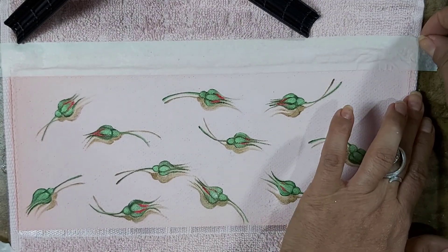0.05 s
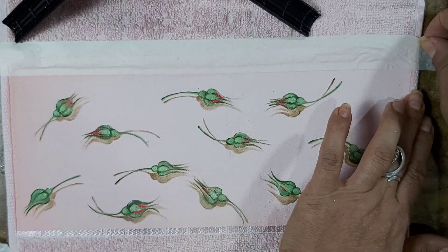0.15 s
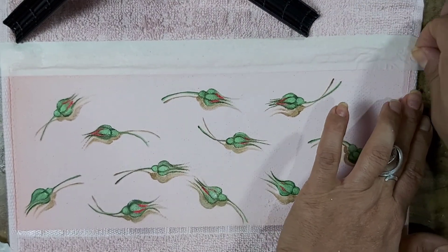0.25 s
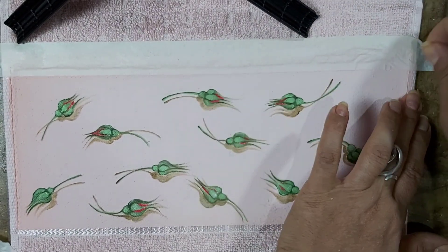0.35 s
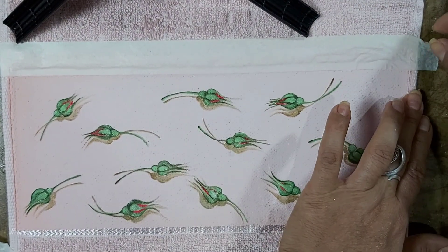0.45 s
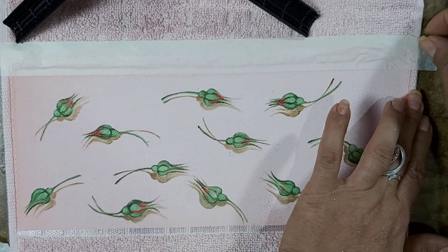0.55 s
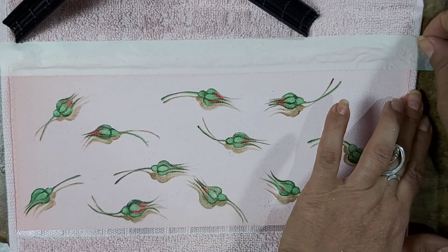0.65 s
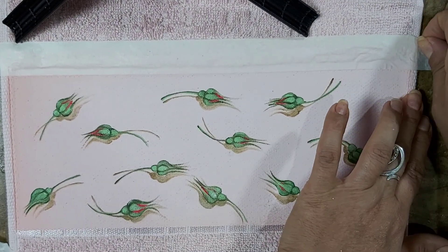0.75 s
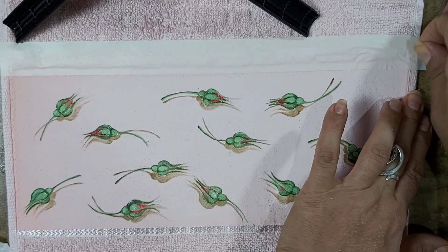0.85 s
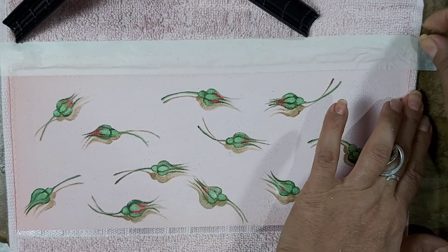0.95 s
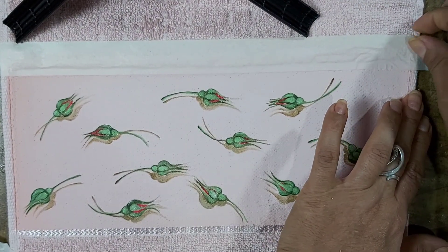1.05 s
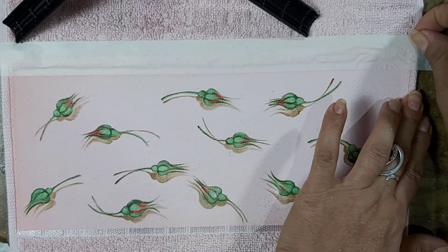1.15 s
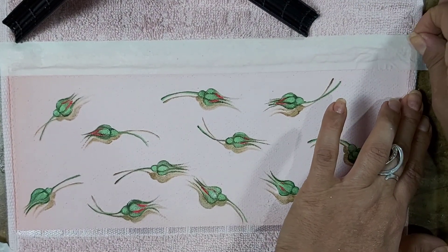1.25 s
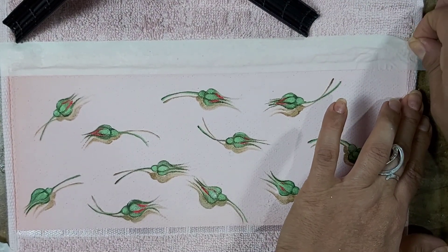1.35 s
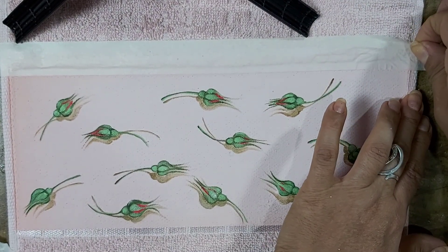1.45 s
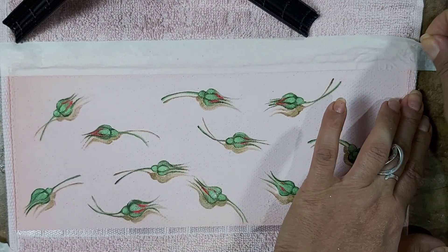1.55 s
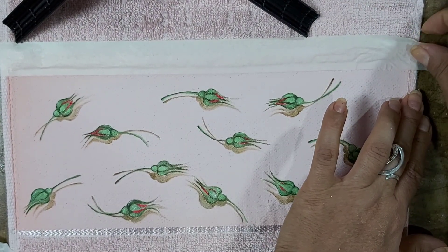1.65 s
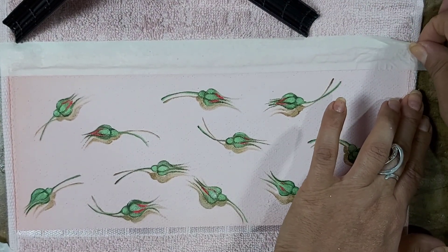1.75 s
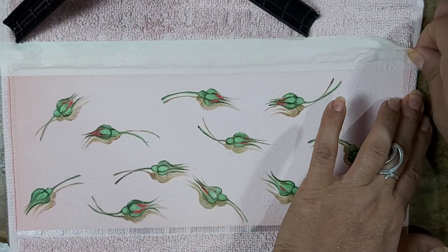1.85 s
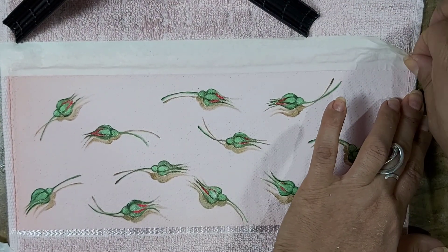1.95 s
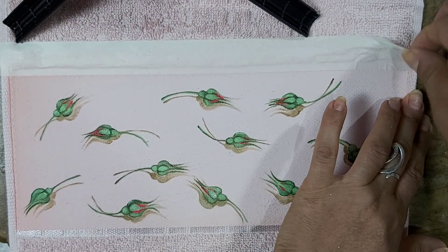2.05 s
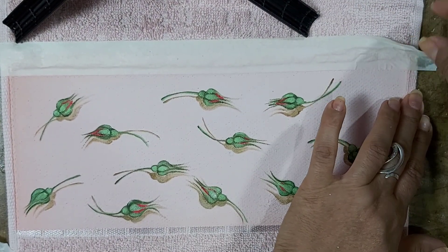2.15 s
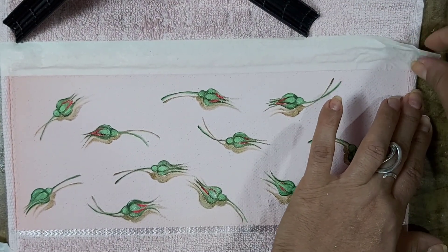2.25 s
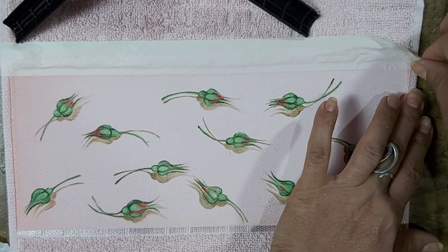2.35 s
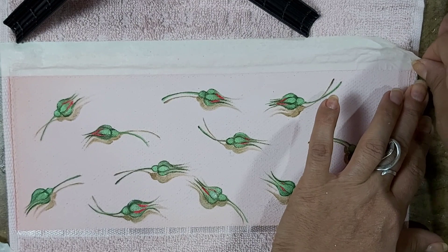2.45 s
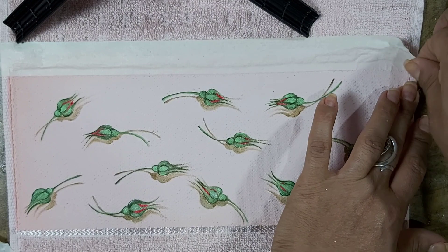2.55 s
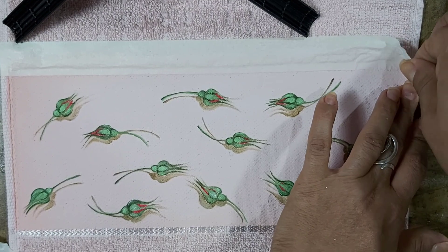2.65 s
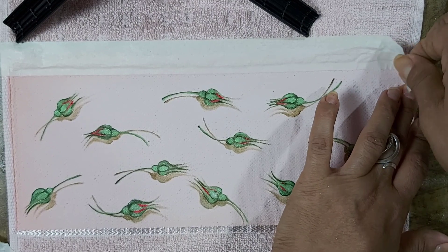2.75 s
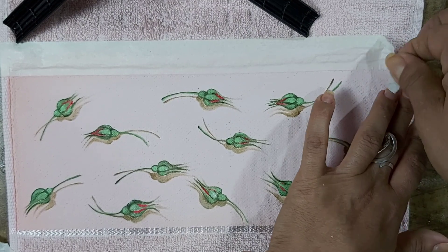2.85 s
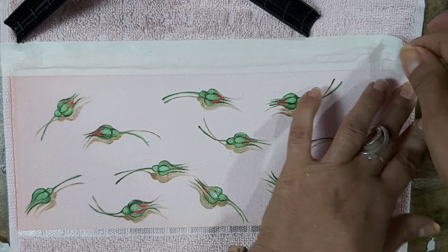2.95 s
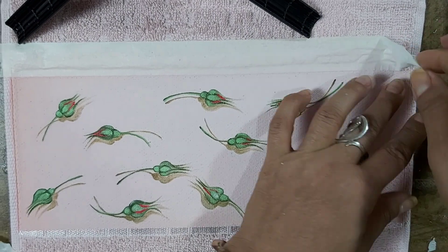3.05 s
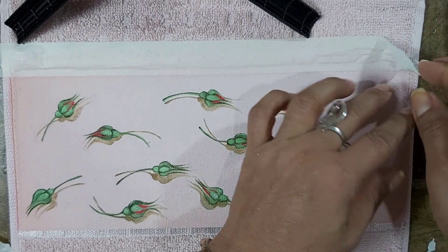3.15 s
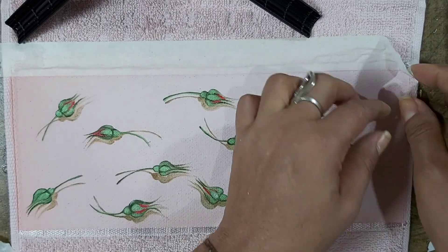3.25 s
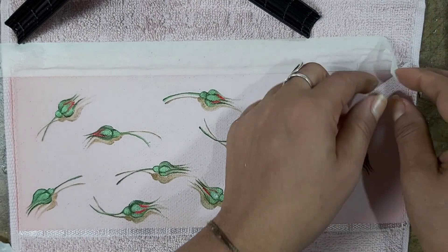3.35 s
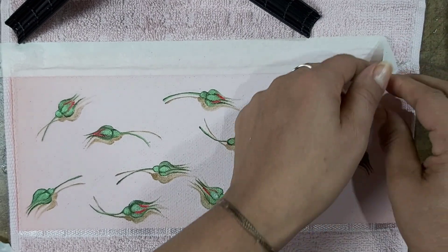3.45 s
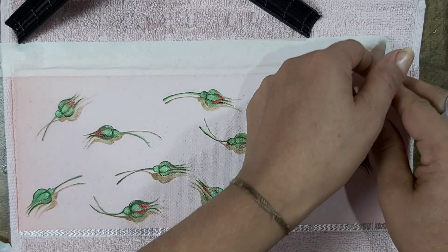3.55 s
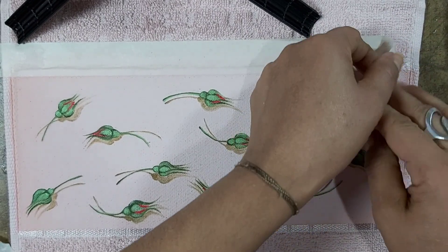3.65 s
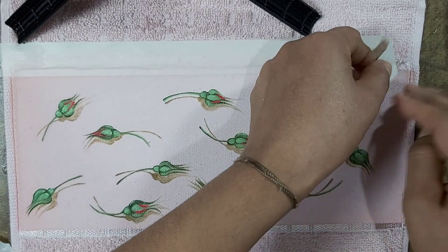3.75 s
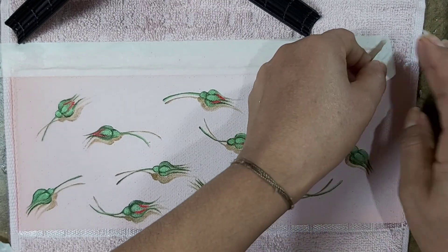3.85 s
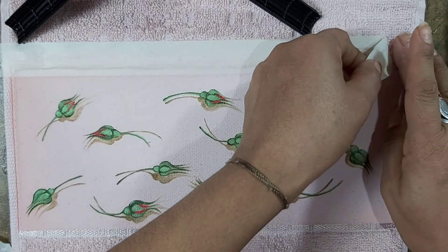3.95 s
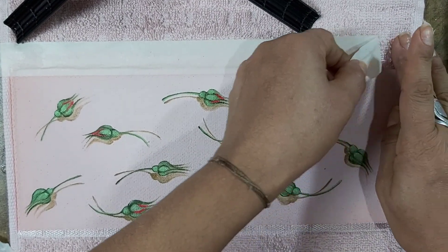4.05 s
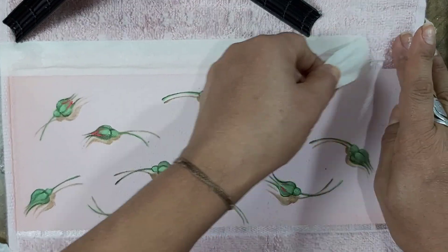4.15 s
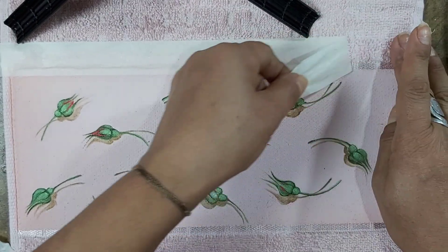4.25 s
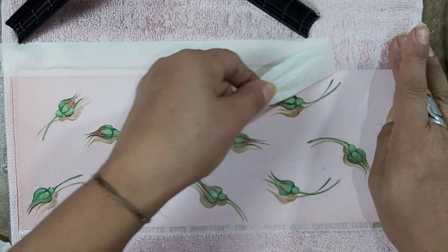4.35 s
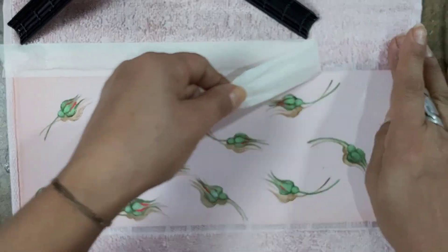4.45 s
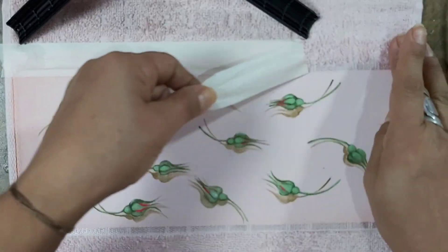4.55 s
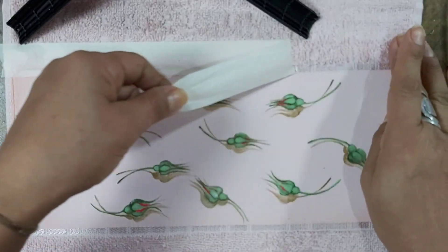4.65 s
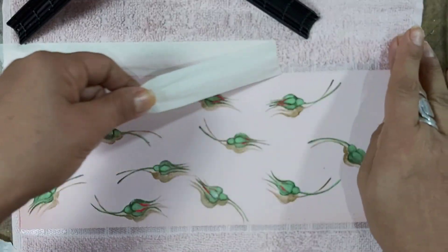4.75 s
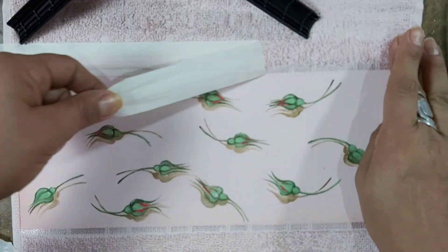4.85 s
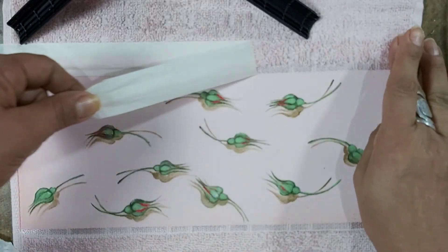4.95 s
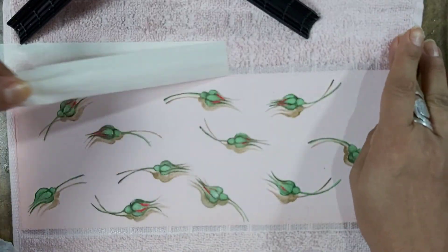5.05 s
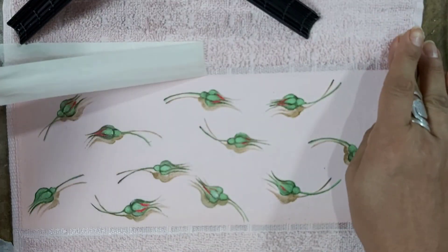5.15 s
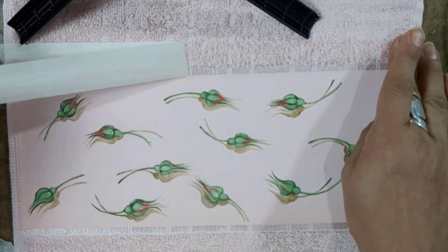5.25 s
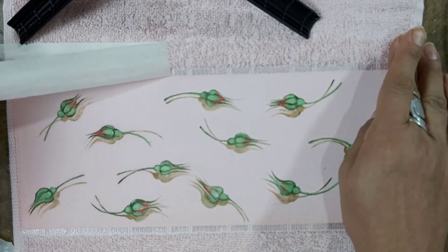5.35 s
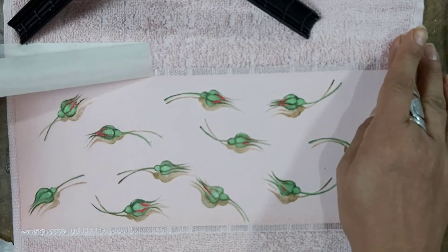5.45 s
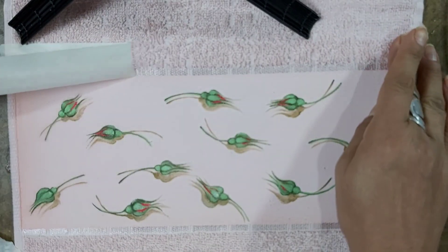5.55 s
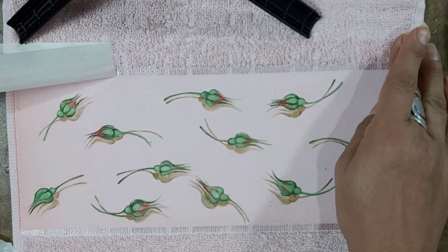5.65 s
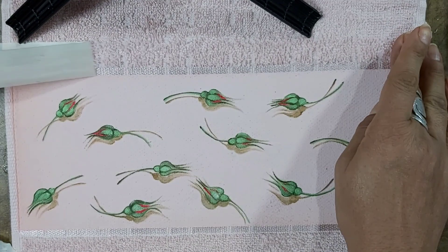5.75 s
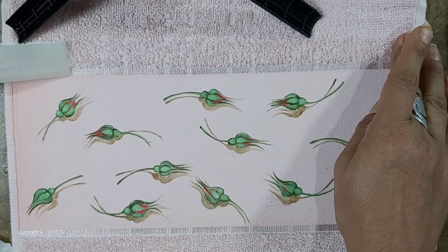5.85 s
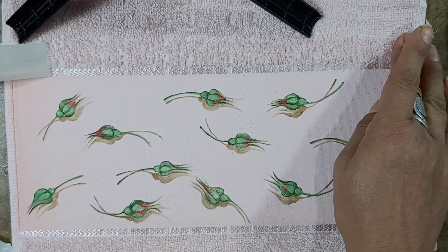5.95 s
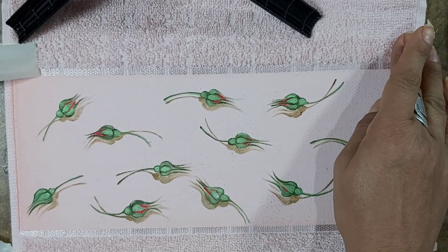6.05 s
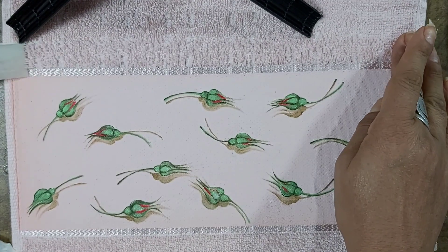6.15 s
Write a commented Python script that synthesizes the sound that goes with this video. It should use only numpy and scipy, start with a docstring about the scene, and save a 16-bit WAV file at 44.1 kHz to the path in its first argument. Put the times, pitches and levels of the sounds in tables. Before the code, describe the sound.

Masking tape is peeled from cloth stretched on a frame, close to the microphone in a small quiet room. First come a few short, scattered tugs with sharp little crackles, soft thumps and light knocks of the frame. Then one long pull gives a bright, rasping rip that drifts from left to right, while the taut cloth hums and drums faintly underneath.

```python
"""In a small quiet room, close to a phone, masking tape is peeled from cloth stretched on a frame.
A few short tugs crackle and knock the frame; then one long pull rips from left to right.
Thousands of glue threads snap, each an impulse, while the paper backing rasps below them.
The taut cloth drums and hums in its modes like a membrane, and reverberation smears the crackle."""
import sys
import numpy as np
from scipy import signal
from scipy.fft import rfft, irfft
from scipy.io import wavfile
from scipy.ndimage import uniform_filter1d, map_coordinates

SR = 44100
rng = np.random.default_rng(int(sys.argv[2]) if len(sys.argv) > 2 else 0)


def persist_wave(psi):
    """Save psi, clipped to +-1, as 16-bit WAV."""
    counts = np.round(np.clip(psi, -1, 1) * 32767).astype(np.int16)
    wavfile.write(sys.argv[1], SR, np.atleast_2d(counts).T)


N = 272979
T, FREQ = np.arange(N) / SR, np.fft.rfftfreq(N, 1 / SR)
TOP_HZ = 14600


def peel(crackle, rasp, ring_hz, ring_db):
    """Shot noise: glue threads snap one by one, more of them as the pull speeds up."""
    # relative spectrum of glue and backing: frequency_hz, level_db
    tape_spectrum = [(300, 4), (600, -11.5), (900, -4), (1400, -4), (1900, -4.3), (2800, -4.5), (4200, -2),
                     (5800, -1), (7600, 1), (10000, 1.1), (12000, 3), (13200, 1.3), (14700, -5)]
    snaps_per_s = 11500 * (0.12 + crackle / crackle.max())
    sizes = undb(3.5 * np.minimum(rng.exponential(size=N), 4)) * rng.choice([-1, 1], N)
    threads = unit((rng.random(N) < snaps_per_s / SR) * sizes / np.sqrt(snaps_per_s))
    # the hand evens out the force over 11 ms
    threads /= np.sqrt(uniform_filter1d(threads ** 2, int(0.011 * SR)) + 1e-6)
    # stick-slip: the edge stutters, a little more while the pull is young
    stutter_db = 1.79 + 0.3 * np.exp(-travel() / 0.14)
    spectrum = rfft(threads * undb(stutter_db * walk(rate_hz=260)))
    colour = undb(at(tape_spectrum, FREQ)) * FREQ ** 2 / (FREQ ** 2 + 250 ** 2)
    treble_rms = np.sqrt(np.mean(colour ** 2 * ((FREQ > 4000) & (FREQ < 15000))))
    middle_rms = np.sqrt(np.mean(colour ** 2 * ((FREQ > 700) & (FREQ < 2800))))
    # the freed strip radiates lower as it grows longer
    lowest_hz = 345 + (960 - 345) * np.exp(-(travel() / 0.28) ** 2)
    out = 0
    for hz, window in bands(320, count=24):
        # glue crackles in the treble, the paper backing rasps below it
        bright = np.clip(np.log(hz / 2300) / np.log(4200 / 2300), 0, 1)
        gain = (crackle / treble_rms) ** bright * (rasp / middle_rms) ** (1 - bright)
        radiation = 1 / np.sqrt(1 + (lowest_hz / hz) ** 8)
        # the strip bends and changes length, so its resonance moves
        strip_db = ring_db * np.exp(-(np.log2(hz / ring_hz) / 0.25) ** 2)
        out += irfft(spectrum * colour * window, N) * gain * radiation * undb(strip_db)
    return out


def pulls():
    """Load and release: tugs build, give way, hold and fade; the strongest of tugs and rip prevails."""
    # short tugs: full_force_s, hold_s, crackle_db, rasp_re_crackle_db, rise_db_per_s, jump_db,
    # ring_hz, ring_db
    tugs = [(1.259, 0.0055, -55, -7, 236.5, 2, 12700, 3), (1.683, 0.018, -57.5, -17, 126, 10, 11900, 11),
            (1.741, 0.078, -53, -25, 139, -1.5, 12300, 4), (2.393, 0.055, -44, -7.5, 138, 5, 4260, 5.5),
            (2.585, 0.047, -43, -4.5, 71, 5, 4070, 6), (2.85, 0.03, -64.5, -6, 59.5, 1.5, 7600, 1),
            (3.427, 0.12, -66.5, -9, 898, -4, 4550, 2)]
    # resonance of the freed strip in the rip: time_s, ring_hz, ring_db
    strip_resonance = [(3.93, 9200, -1.5), (4.07, 7700, 4), (4.24, 7800, -1), (4.3, 11600, 6.5),
                       (4.36, 11400, 3.5), (4.44, 10900, 1), (4.55, 8000, 3), (4.85, 7660, 0.5),
                       (5.0, 12200, 2), (5.1, 12500, 1.5), (5.25, 8800, 1), (5.46, 8500, 4.5),
                       (5.56, 8400, 4.5), (5.7, 11700, 2), (5.9, 9100, 3), (6.19, 8900, 1)]
    lead_s, release_db_per_s = 0.163, 296
    strongest = np.array([*rip(), *curves(strip_resonance)])
    for s, hold_s, db, rasp_db, rise, jump_db, ring_hz, ring_db in tugs:
        build_db = rise * np.minimum(T - s, 0) - jump_db * (T < s)
        release_db = release_db_per_s * np.maximum(T - s - hold_s, 0)
        crackle = undb(db + build_db - release_db) * (T > s - lead_s)
        rasp = crackle * undb(rasp_db + build_db)
        tug = np.array([crackle, rasp, np.full(N, ring_hz), np.full(N, ring_db)])
        strongest = np.where(crackle > strongest[0], tug, strongest)
    return strongest


def rip():
    """Sustained excitation: the amplitude envelopes of crackle and rasp in the long pull."""
    # course of the pull: time_s, crackle_db, rasp_re_crackle_db
    long_pull = [(3.69, -86.5, -28.5), (3.79, -60, -18.5), (3.9, -51.5, -12.5), (3.95, -44.5, -8.5),
                 (4.19, -44.5, -10.5), (4.25, -47.5, -9), (4.35, -43, -11.5), (4.41, -45.5, -11),
                 (4.7, -44.8, -10), (4.82, -42.5, -10), (5.0, -40.5, -11.5), (5.2, -44, -11),
                 (5.45, -43, -9), (5.52, -47, -7), (5.56, -42, -10.5), (5.6, -46.5, -6), (5.75, -46.5, -6),
                 (5.92, -47, -13.5), (6.01, -48.5, -2.5), (6.11, -53.5, -15), (6.19, -47, -9.5)]
    crackle_db, rasp_db = curves(long_pull)
    crackle = undb(crackle_db) * (T > long_pull[0][0])
    return crackle, crackle * undb(rasp_db)


def travel():
    """Uniform motion: the share of the frame that the peeling edge has crossed."""
    start_s, crossing_s = 4.015, 2.08
    return np.clip((T - start_s) / crossing_s, 0, 1)


def snaps():
    """Impulsive release: a patch of glue lets go within a millisecond, a tick with a brief splutter."""
    # snaps of glue and paper: start_s, relative_level_db, centre_hz
    patches = [(1.173, -55.5, 9070), (1.2813, -26, 5400), (1.645, -34, 12300), (1.691, -41, 10000),
               (1.7445, -24, 11500), (1.8995, -35.5, 6850), (1.904, -34, 7860), (2.232, -49.5, 6240),
               (2.251, -52, 7540), (2.407, -22, 9500), (2.46, -26, 6300), (2.586, -24, 4940),
               (2.7463, -36, 11150), (2.862, -31.5, 9600), (3.424, -36.5, 12800), (3.437, -37, 5700),
               (3.505, -31.5, 4500), (3.8193, -27.5, 12500), (3.862, -41, 10000), (3.952, -19, 9300),
               (4.069, -22, 8040), (4.131, -28, 8600), (4.1876, -20.5, 8950), (4.1873, -20.5, 12000),
               (4.3473, -16, 12200), (4.939, -24, 10700), (5.041, -21, 12400)]
    out = np.zeros(N)
    for s, db, hz in patches:
        tick = 0.16 * burst(decay_s=0.00024)
        tick[0] = 1
        add(out, s, tint(tick, resonance(hz, width_hz=11600) ** 2), db - 0.5)
    return out


def knocks():
    """Impact excites modes: each blow thumps the cloth, clacks the frame and flicks the paper."""
    # blows of hand and tape, levels relative: start_s, thump_db, clack_db, clack_hz, crack_db
    blows = [(0.441, -40.5, -62, 700, -92), (.462, -44.5, -74, 700, -92), (1.281, -36.5, -38.5, 900, -22.5),
             (1.305, -39, -45, 600, -33), (1.3282, -35.5, -48, 400, -44), (1.4929, -44, -55.5, 1100, -60),
             (1.521, -36, -54, 1100, -59), (1.543, -39, -54, 1004, -70), (1.566, -41, -65, 900, -78),
             (1.8993, -49, -53, 990, -33.5), (2.106, -32, -45, 1410, -52), (2.132, -32.5, -57, 1400, -73),
             (2.153, -32.5, -51, 1200, -60), (2.861, -33.5, -29.5, 830, -58), (2.884, -37.5, -47, 890, -68),
             (2.908, -34.5, -42, 600, -75), (3.502, -45, -54, 930, -34.5)]
    # modes of the cloth under a fingertip: pitch_hz, width_hz, level_db
    thump_modes = [(135, 130, 6), (179, 40, 8.5), (240, 49, 6), (274, 26, -5)]
    # modes of the held frame: pitch_hz, width_hz, level_db
    frame_modes = [(473, 55, 3.5), (563, 61, 0), (790, 60, 0.5), (960, 280, -3), (1136, 69, -4),
                   (1520, 270, -12)]
    # longer-ringing modes once the hand no longer holds it down: pitch_hz, width_hz, level_db
    free_modes = [(773, 17, 2), (954, 14, 8), (980, 8.3, 5.7), (1106, 24, 1)]
    # relative spectrum of the papery crack: frequency_hz, level_db
    crack_spectrum = [(250, -14), (450, -8), (900, -5.5), (1800, -2), (3000, -12), (6000, -14),
                      (14000, -35)]
    soft_hz, freed_s = 302, 2.8
    soft_lowpass = 1 / (1 + 1j * FREQ / soft_hz - (FREQ / soft_hz) ** 2) ** 2
    thump = irfft(modes(thump_modes) * soft_lowpass, N)
    held = irfft(modes(frame_modes), N)[:SR // 2]
    free = held + irfft(modes(free_modes), N)[:SR // 2]
    crack_colour = undb(at(crack_spectrum, FREQ))
    thumps, clatter = np.zeros((2, N))
    for s, thump_db, clack_db, clack_hz, crack_db in blows:
        clack = tint(free if s > freed_s else held, resonance(clack_hz, width_hz=770))
        crack = tint(burst(decay_s=0.0036), crack_colour)
        add(thumps, s, thump, thump_db - 2.5)
        add(clatter, s, clack, clack_db + 0.5)
        add(clatter, s, crack, crack_db - 6)
    return thumps, clatter


def cloth_drum():
    """Membrane vibration: the pull shakes the cloth's low modes like those of a slack drumhead."""
    # shoves that set the cloth drumming: centre_s, level_db, half_width_s
    shoves = [(3.04, -51.5, 0.14), (3.49, -57.5, 0.076), (3.86, -66, 0.17), (4.23, -49, 0.091),
              (4.82, -57, 0.063), (5.04, -53, 0.075), (5.44, -47.5, 0.11), (5.65, -43.5, 0.11),
              (5.88, -54, 0.088), (6.09, -56, 0.043)]
    # one mode groans near the end of the frame: centre_s, level_db, half_width_s
    groans = [(5.87, -44.5, 0.092), (6.08, -44, 0.037)]
    # overtones that grow toward the far end: pitch_hz, level_re_crackle_db
    overtones = [(66, -15), (84, -11), (105, -8.5)]
    crackle, _ = rip()
    rest_db, slack_s, sag_hz_per_s = -79.5, 5.6, 24
    drive = undb(rest_db) + undb(-14.5) * crackle + swells(shoves)
    # the lowest mode sinks once the tape lets the cloth go slack
    lowest_hz = 51.4 - sag_hz_per_s * np.maximum(T - slack_s, 0)
    fundamental = sway(lowest_hz, drive, waver_db=2.5)
    groan = sway(hz=129, gain=swells(groans), waver_db=-0.5)
    rumble = sum(sway(hz, undb(db) * crackle * travel() ** 3, waver_db=7.5) for hz, db in overtones)
    return fundamental + groan + rumble


def sway(hz, gain, waver_db):
    """Forced oscillation: an uneven pull keeps one mode swinging, wavering in pitch and level."""
    phase = 2 * np.pi * np.cumsum(hz * (1 + 0.0393 * walk(rate_hz=22))) / SR
    return np.sqrt(2) * np.sin(phase) * gain * undb(waver_db * walk(rate_hz=14))


def cloth_hum(rasp):
    """Random excitation: hand and tape drive the cloth's higher modes, and their powers add."""
    # modes of the stretched cloth: pitch_hz, width_hz, level_db
    cloth_modes = [(85, 26, -1), (117.4, 16, -1), (146, 3.5, 4), (161.4, 14.4, -3.5), (188, 8.3, -7.5),
                   (217.9, 3.4, 1), (250, 11, -13), (295.5, 7.7, -2.5), (321, 5.9, -22.5)]
    # the steadying hand settles, then eases off: time_s, weight_share
    hand_weight = [(0, 0.17), (1.5, 0.41), (2.25, 0.94), (3.1, 0.97), (3.35, 0.32)]
    hand = undb(-60) * curves(hand_weight)[0]
    pull = rip()[0] * undb(-12 + 9.5 * travel() ** 2)  # grows as the tape frees the cloth
    drive = np.sqrt(hand ** 2 + (undb(-4.5) * rasp) ** 2 + pull ** 2)
    power = sum(np.abs(undb(db) * resonance(hz, width)) ** 2 for hz, width, db in cloth_modes)
    passband = FREQ ** 2 / (FREQ ** 2 + 50 ** 2) / np.sqrt(1 + (FREQ / 400) ** 8)
    return drive * unit(shape(diffuse(), np.sqrt(power) * passband))


def brushes():
    """Friction noise: skin slides softly over the weave."""
    # strokes of skin: centre_s, relative_level_db, half_width_s, centre_hz
    strokes = [(0.092, -72, 0.022, 6400), (0.643, -74.5, 0.011, 6400), (0.963, -80.5, 0.022, 6400),
               (1.537, -74, 0.025, 9000), (1.615, -86, .012, 12500), (2.175, -74.5, 0.029, 9000),
               (2.26, -75.5, 0.083, 905), (3.313, -82.5, 0.17, 5600)]
    noise = rng.standard_normal(N)
    return sum(swells([(s, db, width_s)]) * unit(shape(noise, resonance(hz, hz)))
               for s, db, width_s, hz in strokes)


def room(x, wet_db, early_db, early_s, steps):
    """Reverberation: early reflections from table and frame, and the walls' tail, along the hand's path."""
    # decay of the room: frequency_hz, t60_s
    decay_times = [(100, 0.25), (700, 0.3), (2000, 0.29), (5000, 0.27), (14000, 0.17)]
    t = T[:SR // 3]
    late_noise, early_noise = diffuse(), diffuse()
    layers = [(shape(late_noise, window), np.exp(-np.log(1000) * t / at(decay_times, hz)))
              for hz, window in bands(100, count=6)]
    build_up, early_decay = 1 - np.exp(-t / 0.00043), np.exp(-t / early_s)
    out = np.zeros((2, N + len(t)))
    place = np.arange(N) * steps / N
    for k, start in enumerate(rng.integers(0, N - len(t), steps + 1)):
        part = slice(start, start + len(t))
        tail = sum(layer[:, part] * decay for layer, decay in layers) * build_up
        early = early_noise[:, part] * early_decay
        response = (undb(wet_db) * unit(tail) + undb(early_db) * unit(early)) / np.sqrt(len(t))
        # each place has its own impulse response and hands over smoothly to the next
        a, b = np.searchsorted(place, [k - 1, k + 1])
        faded = x[a:b] * np.cos(np.pi / 2 * (place[a:b] - k))
        heard = signal.fftconvolve(faded[None], response, axes=1)
        out[:, a:a + heard.shape[1]] += heard
    return out[:, :N]


def ambience():
    """Background noise: the low rumble of the house under a smooth hiss."""
    # relative spectrum of the background: frequency_hz, level_db
    house_spectrum = [(30, -13.5), (50, -6), (90, -6.5), (140, 1.5), (190, -7), (280, -8.5), (400, -21.5),
                      (700, -27.5), (1900, -33), (7000, -44), (11000, -37.5), (14500, -37.5)]
    return undb(-64) * unit(shape(diffuse(), undb(at(house_spectrum, FREQ))))


def diffuse():
    """Diffuse field: noise from all sides is coherent at two microphones only in the bass."""
    # likeness of the two channels: frequency_hz, coherence_ratio
    coherence = [(60, 0.73), (130, 0.92), (290, 0.67), (640, 0.031), (1400, 0), (3000, 0)]
    mid, side = rng.standard_normal((2, N))
    alike = np.clip(at(coherence, FREQ), 0, 1)
    common, opposed = shape(mid, np.sqrt((1 + alike) / 2)), shape(side, np.sqrt((1 - alike) / 2))
    return np.array([common + opposed, common - opposed])


def resonance(hz, width_hz):
    """Response of a damped oscillator, gain 1 at its centre."""
    return 1j * FREQ * width_hz / (hz ** 2 - FREQ ** 2 + 1j * FREQ * width_hz)


def modes(table):
    """Superposition: a body's response is the sum of its modes."""
    return sum(undb(db) * resonance(hz, width) for hz, width, db in table)


def shape(x, response):
    """Linear filtering by a frequency response."""
    return irfft(rfft(x) * response, N)


def tint(x, response):
    """Linear filtering of a short sound; it dies away within the first half, which is kept."""
    response = np.interp(np.fft.rfftfreq(len(x), 1 / SR), FREQ, response)
    return irfft(rfft(x) * response, len(x))[:len(x) // 2]


def bands(low_hz, count):
    """Filter bank: log-spaced centres with overlapping windows that sum to 1."""
    centres = np.geomspace(low_hz, TOP_HZ, count)
    return [(hz, np.interp(np.log(FREQ + 1), np.log(centres), row))
            for hz, row in zip(centres, np.eye(count))]


def burst(decay_s):
    """A quarter second of noise in exponential decay."""
    return rng.standard_normal(SR // 4) * np.exp(-np.minimum(T[:SR // 4] / decay_s, 50))


def walk(rate_hz):
    """Smooth random modulation with spread near 1."""
    knots = rng.standard_normal(4096)
    return 1.2 * np.interp(T * rate_hz, np.arange(len(knots)), knots)


def swells(table):
    """Gaussian swells of gain, one for each row."""
    return sum(undb(db) * np.exp(-((T - s) / width_s) ** 2) for s, db, width_s in table)


def curves(table):
    """Each column of a timed table, interpolated sample by sample."""
    s, *columns = np.transpose(table)
    return [np.interp(T, s, column) for column in columns]


def at(points, hz):
    """Interpolate a table along a log-frequency axis."""
    frequencies, values = np.transpose(points)
    return np.interp(np.log(hz + 1), np.log(frequencies), values)


def add(track, s, sound, peak_db):
    """Superpose a short sound on a track at a given peak level."""
    start = int(s * SR)
    sound = sound[:min(SR // 4, N - start)]
    track[start:start + len(sound)] += undb(peak_db) * sound / np.abs(sound).max()


def pan(left_minus_right_db):
    """Left and right gains for a level difference."""
    return undb(np.array([[0.5], [-0.5]]) * left_minus_right_db)


def undb(db):
    """Decibels to gain."""
    return 10 ** (np.asarray(db) / 20)


def unit(x):
    """Scale to rms 1."""
    return x / np.sqrt(np.mean(x ** 2))


def scene():
    """Differences of arrival time and level carry the peeling edge past two microphones."""
    # balance of the treble: time_s, left_minus_right_db
    treble_balance = [(0, -2), (1.8, 0), (2.5, -1.5), (3.5, 0.5), (4.05, 2), (4.35, -2), (5.3, -6),
                      (6.19, -3.5)]
    crackle, rasp, ring_hz, ring_db = pulls()
    tape = peel(crackle, rasp, ring_hz, ring_db) + brushes()
    ticks = snaps()
    thumps, clatter = knocks()
    near = undb(-5.5) * tape + ticks + undb(-2.7) * thumps + undb(-10) * clatter
    left_lead_s = np.interp(travel(), [0, 1], [0.244e-3, -0.13e-3])
    direct = np.array([map_coordinates(near, [(T + side * left_lead_s / 2) * SR], order=3)
                       for side in (1, -1)])
    tape_echo = room(tape + undb(-0.5) * ticks, wet_db=-3.5, early_db=-2.5, early_s=0.0042, steps=150)
    knock_echo = room(clatter + undb(-4) * thumps, wet_db=-1.2, early_db=-21.5, early_s=0.007, steps=8)
    arriving = direct + tape_echo + knock_echo
    # acoustic shadow: the phone's body shades the treble from the far microphone
    treble = shape(arriving, FREQ / (FREQ + 1500))
    shaded = arriving + (pan(curves(treble_balance)[0]) - 1) * treble
    cloth = pan(-2.5) * cloth_drum() + pan(-3.5) * cloth_hum(rasp)
    return shaded + cloth + ambience()


def record(dry):
    """Band limiting: the phone cuts the deepest rumble and the top of the treble."""
    lean = signal.sosfilt(signal.butter(2, 28, "highpass", fs=SR, output="sos"), dry)
    return signal.sosfilt(signal.ellip(10, .2, 70, TOP_HZ, fs=SR, output="sos"), lean)


dry = scene()
out = record(dry)
persist_wave(out)
```